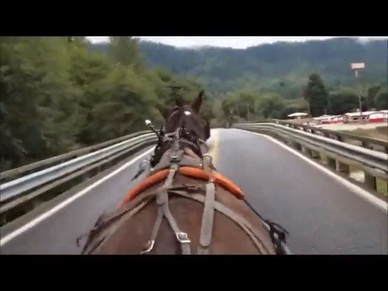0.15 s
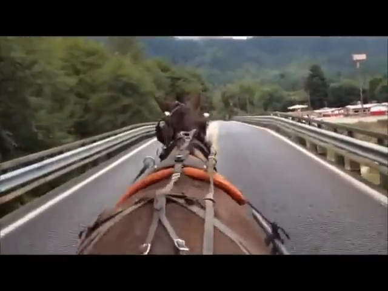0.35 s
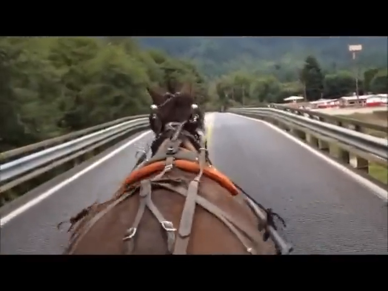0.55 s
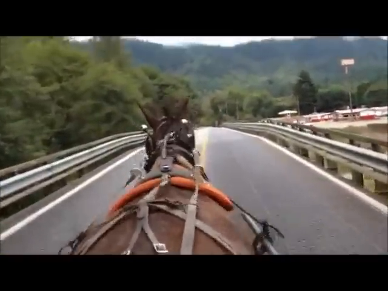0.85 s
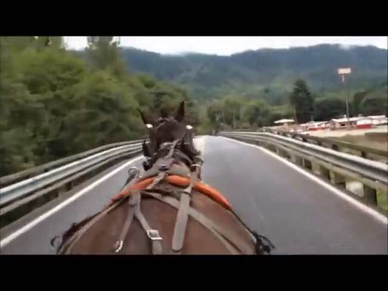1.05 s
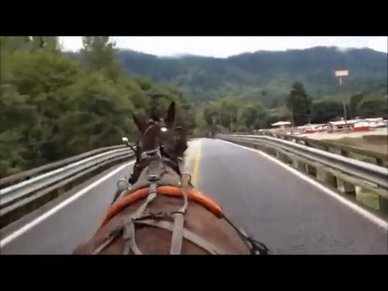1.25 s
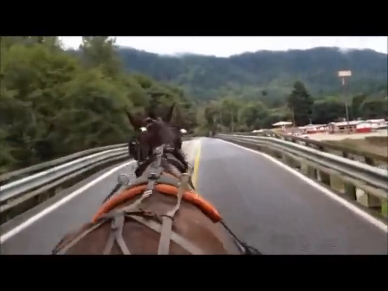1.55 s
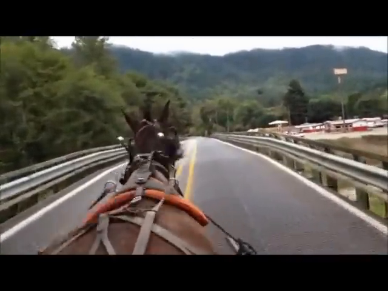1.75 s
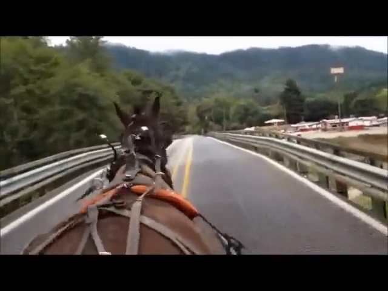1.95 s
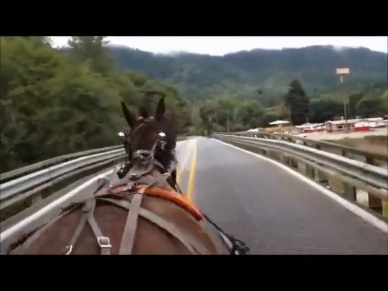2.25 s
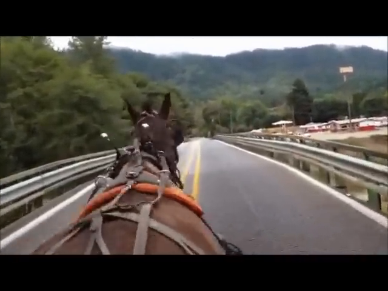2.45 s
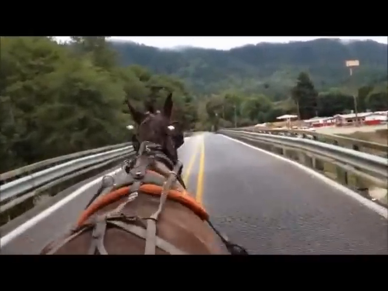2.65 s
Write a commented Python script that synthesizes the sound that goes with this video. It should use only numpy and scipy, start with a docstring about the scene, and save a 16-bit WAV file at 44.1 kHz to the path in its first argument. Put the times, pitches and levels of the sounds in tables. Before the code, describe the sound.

Horse trotting on a paved road, hollow metallic hoofbeats over rolling wheels and a rattling cart

```python
"""Horse and cart on a paved road

A shod horse trots along, heard from the cart it pulls.
Wheel rumble, hiss and body drones are shaped noise; bumps are short dying sines.
Harness fittings clink in dense rings of noise, buckles tick in high sines, and a strap snaps once.
Each hoof lands in two quick touches: the iron shoe clinks and the hollow hoof clops, both dying in a dense wash."""
import sys
import numpy as np
from scipy import signal
from scipy.fft import rfft, irfft
from scipy.io import wavfile
from scipy.ndimage import uniform_filter1d

SR = 44100
rng = np.random.default_rng(int(sys.argv[2]) if len(sys.argv) > 2 else 0)


def wav_record(signal):
    """Record a signal, one row per channel, as 16-bit PCM in the file named by sys.argv[1]."""
    frames = np.transpose(np.atleast_2d(signal))
    bounded = np.clip(frames, -1, 1)
    # unit amplitude maps onto the largest positive 16-bit level
    quanta = np.round(bounded * 32767).astype(np.int16)
    wavfile.write(sys.argv[1], SR, quanta)


N = 123039

# Bright spectrum of struck iron. Each row: frequency in Hz, relative level in dB per Hz.
SHOE = [(300, -27.5), (1000, -1), (2000, -4), (3000, -0.5), (4200, -5), (5300, -5), (6000, -0.5),
        (6650, 4.5), (7400, 1), (8200, 3.5), (8800, -0.5), (9600, -9.5), (10400, -8.5), (11500, -4.5),
        (12500, -12), (13300, -8), (14300, -17), (15500, -27)]
# How long the wash lasts. Each row: frequency in Hz, time to fall 60 dB in seconds.
WASH = [(200, 0.6), (700, 0.78), (1500, 0.66), (2600, 0.41), (4500, 0.35), (7000, 0.22), (11000, 0.18),
        (16000, 0.15)]
RING_SIZE = 32768   # samples in one blow
SHOE_ATTACK_S = 0.0013


def from_db(db):
    """Turns decibels into an amplitude factor."""
    return 10 ** (np.asarray(db) / 20)


def rms_one(x):
    """Scales a signal to an RMS of 1."""
    return x / np.sqrt(np.mean(x ** 2) + 1e-20)


def at_hz(points, hz):
    """Reads a table on a log-frequency axis."""
    f, value = np.transpose(points)
    return np.interp(np.log(hz), np.log(f), value)


def bins(size):
    """Frequencies of the spectrum in Hz, kept above zero for the logarithm."""
    return np.maximum(np.fft.rfftfreq(size, 1 / SR), 1)


def add(out, s, sound):
    """Mixes a sound in at a time in seconds."""
    i = max(int(s * SR), 0)
    out[i:i + len(sound)] += sound[:max(N - i, 0)]


def wander(size, span):
    """A smooth random curve with a spread of 1: noise averaged twice over the span."""
    span = max(int(span), 1)
    once = uniform_filter1d(rng.standard_normal(size), span)
    return rms_one(uniform_filter1d(once, span))


def level(curve):
    """Draws a fader move from rows of seconds and dB."""
    return from_db(np.interp(np.arange(N) / SR, *np.transpose(curve)))


def shaped_noise(gain):
    """Steady noise with the given spectrum, at an RMS of 1."""
    return rms_one(irfft(rfft(rng.standard_normal(N)) * gain, N))


def fade(t60):
    """An exponential decay that falls 60 dB in t60 seconds."""
    t = np.arange(RING_SIZE) / SR
    return np.exp(-np.log(1000) * t / t60)


def swell(attack_s):
    """A soft contact builds up."""
    return 1 - np.exp(-np.arange(RING_SIZE) / SR / attack_s)


def ping(hz, t60):
    """One dying sine."""
    t = np.arange(RING_SIZE) / SR
    return np.sin(2 * np.pi * hz * t) * fade(t60)


def ripple_db():
    """Each blow favours its own modes: a random ripple along the spectrum."""
    depth_db, smoothing_hz = 1.5, 200
    return depth_db * wander(RING_SIZE // 2 + 1, smoothing_hz * RING_SIZE / SR)


def dense_ring(colour_db, common, attack_s, length=1):
    """A blow sets countless modes ringing; each band dies at its own rate, the treble soonest."""
    same_ring = 0.14   # share of power taken from the common ringing
    grit_db, grit_s = 1.6, 0.0016   # road grit roughens the ringing
    bite, bite_s = 0.13, 0.0011   # extra crack at first contact
    hz, t = bins(RING_SIZE), np.arange(RING_SIZE) / SR
    grit = rms_one(uniform_filter1d(rng.standard_normal(RING_SIZE), max(int(grit_s * SR), 1)))
    own = rms_one(rng.standard_normal(RING_SIZE) * from_db(grit_db * grit))
    blend = np.sqrt(same_ring) * common + np.sqrt(1 - same_ring) * own
    modes = rfft(blend) * rms_one(from_db(colour_db))
    centres, t60s = np.transpose(WASH)
    ring = np.zeros(RING_SIZE)
    # overlapping bands, crossfaded between neighbouring rows of the wash
    for band, t60 in zip(np.eye(len(WASH)), t60s):
        share = np.interp(np.log(hz), np.log(centres), band)
        ring += irfft(modes * share) * fade(t60 * length)
    return ring * swell(attack_s) * (1 + bite * np.exp(-t / bite_s))


def wheels():
    """Wheels roll on the asphalt: shaped noise whose treble hiss wavers on its own fader."""
    # Tone of the rolling. Each row: frequency in Hz, relative level in dB per Hz.
    rolling_tone = [(100, -42), (280, -8), (420, -3), (700, -2), (1400, -5), (2200, -12), (3300, -20),
                    (5000, -34), (6800, -25.5), (8300, -33.5), (9800, -40.5), (12000, -39.5), (15500, -50)]
    # Fader of the wheels. Each row: time in seconds, level in dB.
    wheel_fader = [(0, -22.5), (.17, -30.5), (.39, -26.5), (.65, -24), (.765, -21.5), (.80, -30.5),
                   (.87, -28), (1.15, -22), (1.35, -26), (1.62, -22), (1.85, -24.5), (2.1, -19.5),
                   (2.48, -18.5), (2.72, -21.5), (2.79, -24.5)]
    # Fader of the hiss against the wheels. Each row: time in seconds, level in dB.
    hiss_fader = [(.17, 8), (.45, -0.5), (1.2, 0), (1.67, -5.5), (1.85, -0.5), (2.13, -3), (2.38, 0.5),
                  (2.52, -2.5)]
    hiss_from_hz, waver_db, waver_s = 4400, 2.5, 0.015
    hz = bins(N)
    roll = shaped_noise(from_db(at_hz(rolling_tone, hz)))
    hiss = irfft(rfft(roll) / (1 + (hiss_from_hz / hz) ** 4), N)
    waver = from_db(waver_db * wander(N, waver_s * SR))
    return level(wheel_fader) * (roll - hiss + hiss * level(hiss_fader) * waver)


def cart_body():
    """The cart body rumbles low and drones at a few resonances: noise in broad and narrow bands."""
    # Fader of the rumble. Each row: time in seconds, level in dB.
    rumble_fader = [(0, -27.5), (.17, -30.5), (.3, -26), (.6, -23.5), (.9, -30), (1.25, -32), (1.55, -26),
                    (1.85, -31.5), (2.15, -25), (2.5, -30), (2.79, -28)]
    # Tone of the rumble. Each row: frequency in Hz, relative level in dB per Hz.
    rumble_tone = [(25, -45), (55, -31), (90, -16), (150, -1.5), (200, 0), (270, 2), (380, -6), (600, -25),
                   (2000, -44), (15000, -80)]
    # Drones. Each row: centre in Hz, full width at half amplitude in Hz, level in dB.
    drones = [(260.6, 25, -39.5), (686, 50, -45.5), (1375, 43, -42.5)]
    hz = bins(N)
    out = level(rumble_fader) * shaped_noise(from_db(at_hz(rumble_tone, hz)))
    for centre, width, db in drones:
        out += from_db(db) * shaped_noise(1 / (1 + (2 * (hz - centre) / width) ** 2))
    return out


def cart_bumps():
    """The cart thumps over bumps: short low sines, thinned underneath."""
    # Each row: start in seconds, level in dB, pitch in Hz.
    bumps = [(0.054, -10.5, 172), (0.556, -12, 190), (0.746, -17.5, 272), (1.374, -14, 292),
             (1.384, -12.5, 156), (1.403, -13, 237), (1.702, -12, 191), (2.155, -9.5, 186),
             (2.184, -14, 149), (2.217, -5, 189)]
    low_cut_hz, t60_s, attack_s = 111, 0.08, 0.0021
    planks = signal.butter(2, low_cut_hz, "high", fs=SR, output="sos")
    out = np.zeros(N)
    for s, db, pitch in bumps:
        thump = swell(attack_s) * ping(pitch, t60_s)
        add(out, s, from_db(db) * signal.sosfilt(planks, thump))
    return out


def buckle_ticks():
    """Tiny buckles tick: three high sines, each slightly detuned at random."""
    # Each row: start in seconds, level in dB.
    ticks = [(.043, -28), (1.347, -22), (2.090, -21)]
    buckle_hz, t60_s, attack_s = (11600, 12000, 13100), 0.021, 0.00066
    out = np.zeros(N)
    for s, db in ticks:
        pings = [ping(f * rng.normal(1, 0.0146), t60_s) for f in buckle_hz]
        add(out, s, from_db(db) * swell(attack_s) * np.mean(pings, axis=0))
    return out


def harness_clinks(iron):
    """Fittings knock together: a bright iron ring over a dull clank, both shorter than a shoe's ring."""
    # Each row: start in seconds, bright level in dB, dull clank level in dB.
    clinks = [(0.067, -37, -22.5), (0.123, -36, -25.5), (0.692, -29.5, -28.5), (.729, -20, -36),
              (0.754, -27, -29), (.7775, -29, -31), (1.251, -29, -24.5), (1.312, -34, -27.5),
              (1.338, -44, -31), (1.604, -37, -42), (2.157, -23, -23), (2.432, -25, -27),
              (2.461, -30.5, -23.5), (2.674, -31.5, -32)]
    # Tone of the dull clank. Each row: frequency in Hz, relative level in dB per Hz.
    clank_tone = [(400, -20), (1500, 2), (2400, -3.5), (3600, -1), (5000, -6.5), (7000, -12), (15000, -32)]
    bright_length, clank_length = 0.57, 0.34   # against the wash
    out, hz = np.zeros(N), bins(RING_SIZE)
    for s, bright_db, clank_db in clinks:
        ripple = ripple_db()
        bright = dense_ring(at_hz(SHOE, hz) + ripple, iron, SHOE_ATTACK_S, bright_length)
        clank = dense_ring(at_hz(clank_tone, hz) + ripple, iron, SHOE_ATTACK_S, clank_length)
        add(out, s, from_db(bright_db) * bright)
        add(out, s, from_db(clank_db) * clank)
    return out


def strap_snap():
    """A strap snaps once, a very short sine, and sets a harness ring jingling in longer sines."""
    # One row: start in seconds, level in dB before the low cut, pitch in Hz, time to fall 60 dB in seconds.
    snap_row = (.7773, 15, 1600, 0.002)
    # Modes of the jingling ring. Each row: pitch in Hz, level in dB.
    jingle = [(1100, -20), (2500, -22), (4950, -23), (7500, -22)]
    attack_s, low_cut_hz, jingle_t60_s = 0.00048, 450, 0.045
    out = np.zeros(N)
    s, db, pitch, t60 = snap_row
    thin = signal.butter(2, low_cut_hz, "high", fs=SR, output="sos")
    add(out, s, from_db(db) * signal.sosfilt(thin, swell(attack_s) * ping(pitch, t60)))
    for mode_hz, mode_db in jingle:
        add(out, s, from_db(mode_db) * ping(mode_hz, jingle_t60_s))
    return out


def clop_colour(hz, centre_hz, peak_db):
    """The hoof's spectrum with one broad resonance, set by the part that meets the road."""
    # Tone of the hoof. Each row: frequency in Hz, relative level in dB per Hz.
    hoof_tone = [(100, -34), (250, -20), (380, -7), (520, 1.5), (700, 0), (1000, -6.5), (1500, -1),
                 (2200, -1.5), (3000, -9.5), (4000, -9), (5200, -30), (12000, -55)]
    spread_octaves = 0.41   # standard deviation of the bell
    bell = np.exp(-.5 * (np.log2(hz / centre_hz) / spread_octaves) ** 2)
    return at_hz(hoof_tone, hz) + peak_db * bell


def hollow(hz):
    """One resonance of the hoof capsule, rough in pitch, dying with the wash."""
    width_hz, attack_s, length = 50, 0.0013, 1.02   # length against the wash
    t = np.arange(RING_SIZE) / SR
    # a random walk in phase widens the tone
    drift = np.cumsum(rng.standard_normal(RING_SIZE)) * np.sqrt(2 * np.pi * width_hz / SR)
    tone = np.sin(2 * np.pi * hz * t + drift)
    edges = [hz / 2 ** (1 / 4), hz * 2 ** (1 / 4)]   # half an octave
    band = signal.butter(2, edges, "band", fs=SR, output="sos")
    return signal.sosfilt(band, tone) * swell(attack_s) * fade(length * at_hz(WASH, hz))


def hooves(iron):
    """Each landing is two touches, each a bright shoe clink over a clop; the hoof rings hollow once it sits flat."""
    # Each row: start in seconds, shoe level in dB, hoof level in dB, delay of the second touch in seconds,
    # its shoe level in dB, its hoof level in dB, hollow pitch in Hz, hollow level in dB,
    # overtone pitch in Hz, overtone level in dB, first clop's resonance in Hz, second clop's resonance in Hz,
    # height of both resonances in dB (a dip if negative).
    landings = [(.211, -13, -13, .031, -18.5, -13.2, 928, -17.5, 1303, -20.5, 1830, 820, 9),
                (.406, -22, -14, 0.012, -15.5, -13, 556, -17, 1505, -29, 1280, 800, 7),
                (.463, -17, -28, .008, -29, -19, 1053, -19, 1980, -37, 1500, 1200, 5),
                (.524, -16, -15.5, .014, -10.5, -16.5, 642.5, -18.5, 1224, -16.5, 1410, 950, 8),
                (.815, -11, -16.5, 0.021, -17, -15, 875, -16.5, 2780, -23, 1700, 750, -0.5),
                (.991, -22, -16, 0.0099, -16, -14.5, 1236, -23, 2610, -22, 1100, 1580, 5.5),
                (1.125, -20, -29, .014, -20, -21, 1340, -32, 3073, -31, 1500, 1200, -4),
                (1.403, -11.5, -16.5, .027, -17.5, -12.5, 668, -17.5, 1400, -15.5, 1380, 705, 7),
                (1.682, -14, -19, .027, -14, -11.5, 773, -13.5, 1770, -19, 736, 1880, 8),
                (1.879, -24.5, -13, .010, -17, -16.5, 961, -15, 1377, -12, 1400, 740, 5),
                (1.969, -13.5, -12.5, 0.0085, -16.5, -11, 728, -26, 1500, -20, 1400, 930, 5),
                (2.192, -18.5, -18, .008, -33, -32, 755, -36, 1620, -34, 2660, 1600, 4),
                (2.256, -15.5, -13.5, .024, -12.5, -13, 540, -22, 2640, -15.5, 520, 1400, 1),
                (2.535, -12, -18, .013, -23, -23.5, 947, -20, 2220, -20.5, 1900, 950, 11)]
    hoof_attack_s = 0.0028
    knock_attack_s, knock_length = 0.0006, 0.035   # length against the wash
    out, hz = np.zeros(N), bins(RING_SIZE)
    horn = rng.standard_normal(RING_SIZE)   # ringing that all clops share
    for (s, shoe_db, hoof_db, lag, shoe2_db, hoof2_db, hollow_hz, hollow_db,
         over_hz, over_db, clop_hz, clop2_hz, peak_db) in landings:
        shoe = at_hz(SHOE, hz) + ripple_db()
        first = clop_colour(hz, clop_hz, peak_db)
        second = clop_colour(hz, clop2_hz, peak_db)
        touches = ((s, shoe_db, hoof_db, first), (s + lag, shoe2_db, hoof2_db, second))
        for start, iron_db, horn_db, clop in touches:
            add(out, start, from_db(iron_db) * dense_ring(shoe, iron, SHOE_ATTACK_S))
            add(out, start, from_db(horn_db) * dense_ring(clop, horn, hoof_attack_s))
        # the dry knock of first contact
        add(out, s, from_db(hoof_db) * dense_ring(first, horn, knock_attack_s, knock_length))
        add(out, s + lag, from_db(hollow_db) * hollow(hollow_hz))
        add(out, s + lag, from_db(over_db) * hollow(over_hz))
    return out


def scene():
    """Cart, harness and horse in one channel."""
    iron = rng.standard_normal(RING_SIZE)   # ringing that shoes and fittings share
    cart = wheels() + cart_body() + cart_bumps()
    harness = buckle_ticks() + harness_clinks(iron) + strap_snap()
    return (cart + harness + hooves(iron))[None]


def record(dry):
    """The highest peaks overload, the top is cut."""
    stopband_hz = 16100   # 70 dB down from here up
    lowpass = signal.cheby2(20, 70, stopband_hz, fs=SR, output="sos")
    return signal.sosfilt(lowpass, np.clip(dry, -.93, .93))


dry = scene()
out = record(dry)
wav_record(out)
```